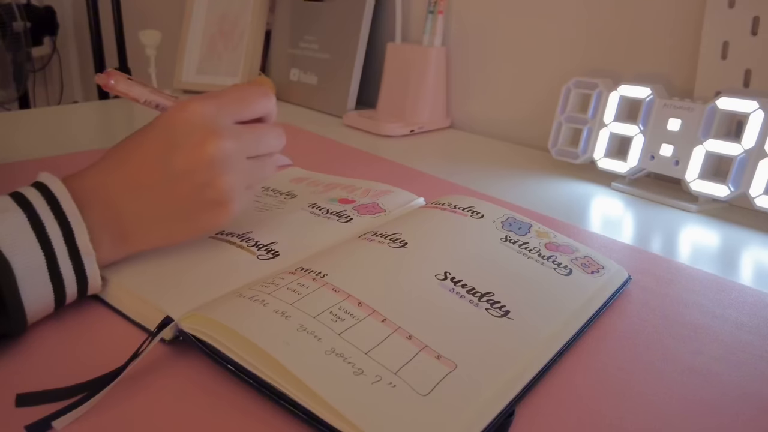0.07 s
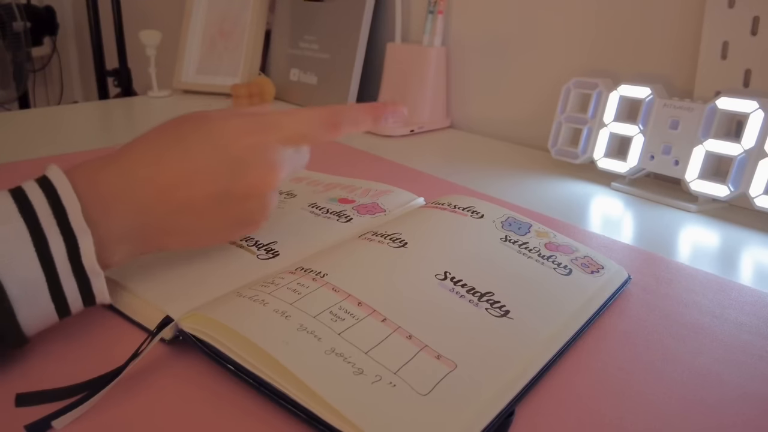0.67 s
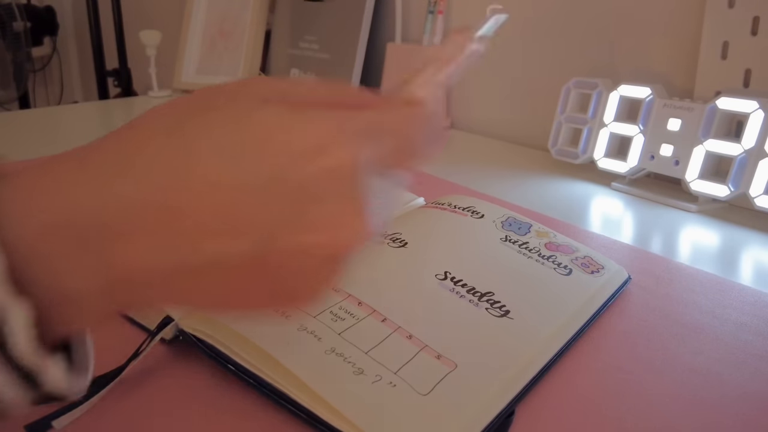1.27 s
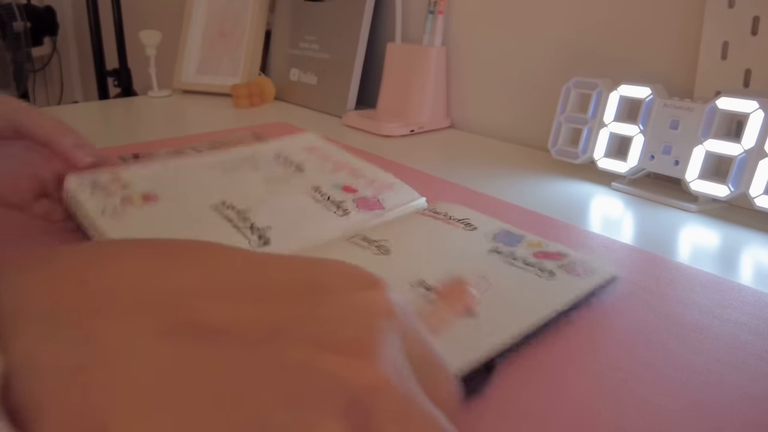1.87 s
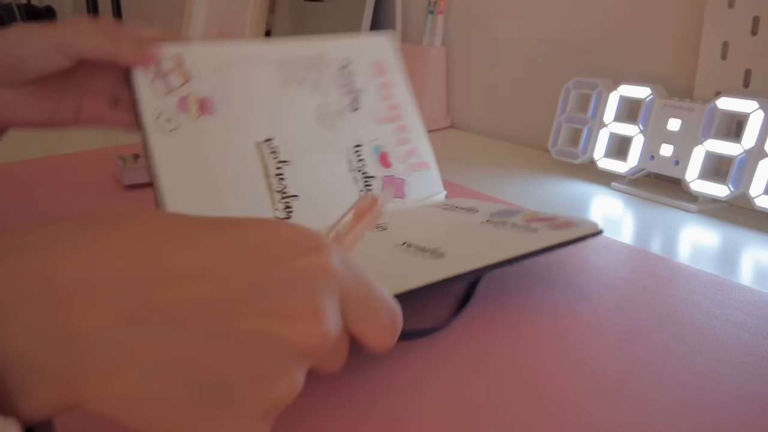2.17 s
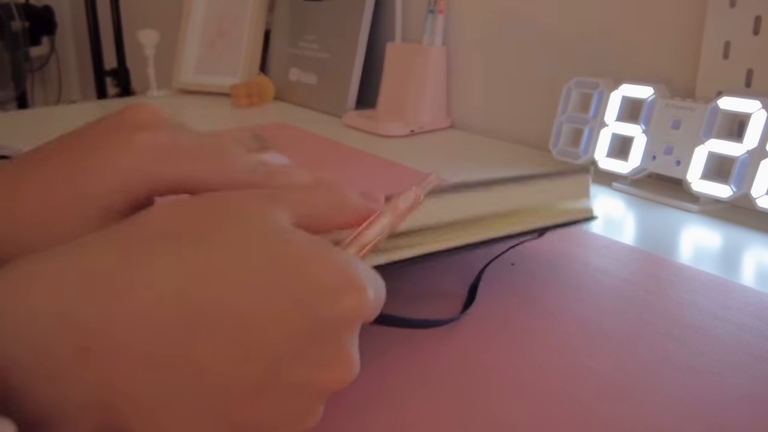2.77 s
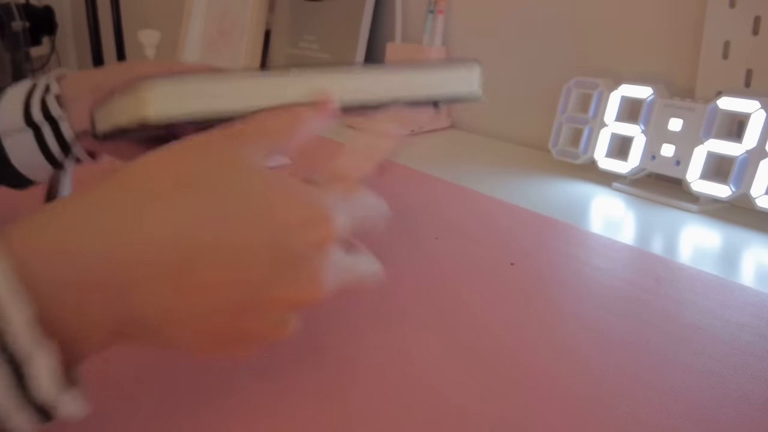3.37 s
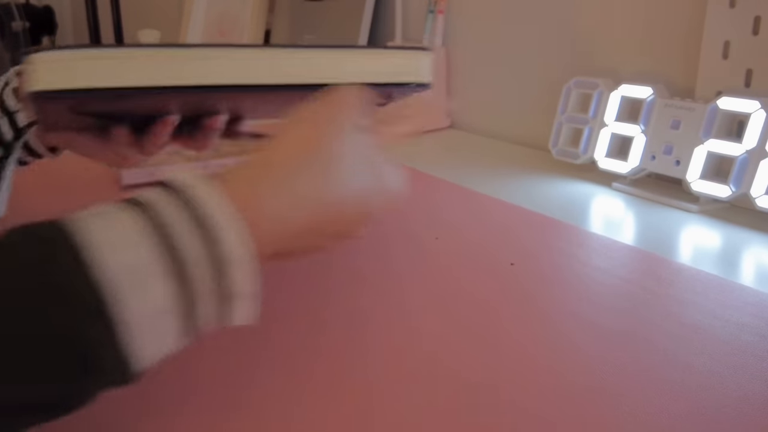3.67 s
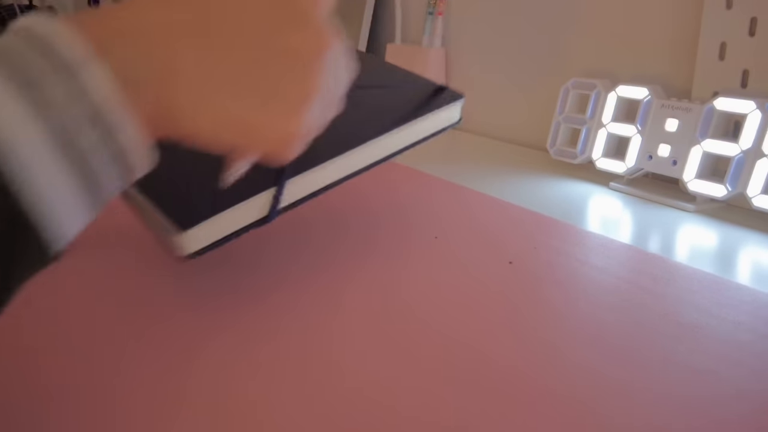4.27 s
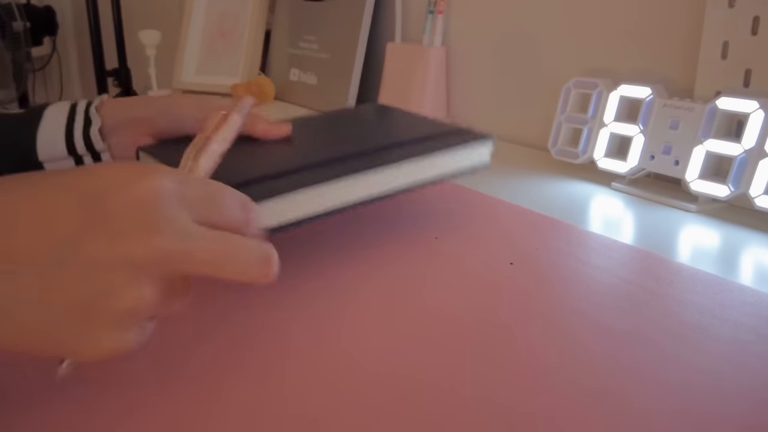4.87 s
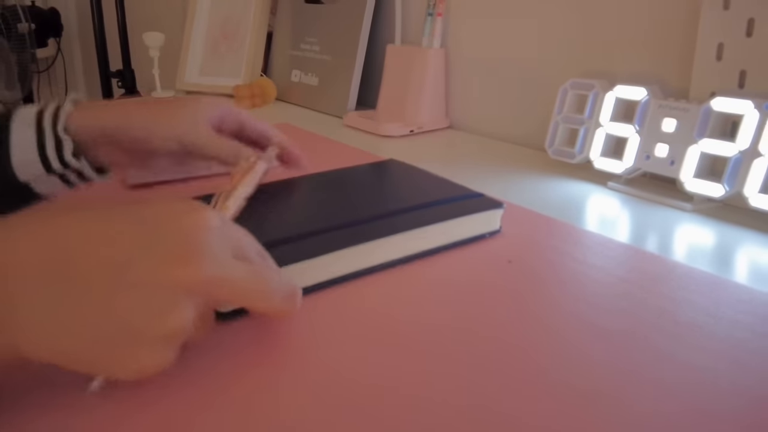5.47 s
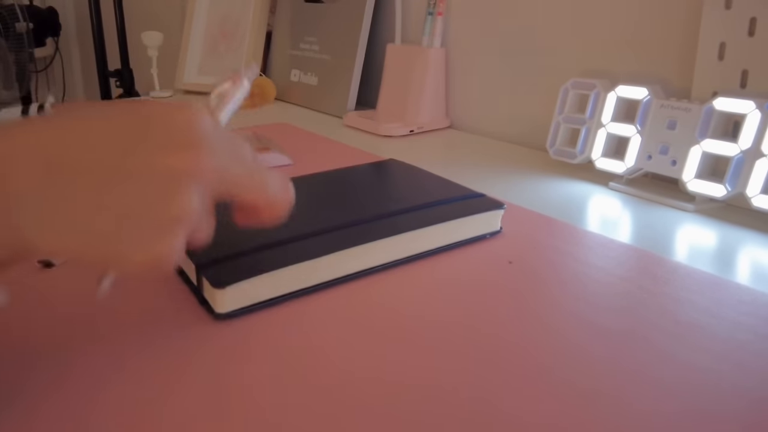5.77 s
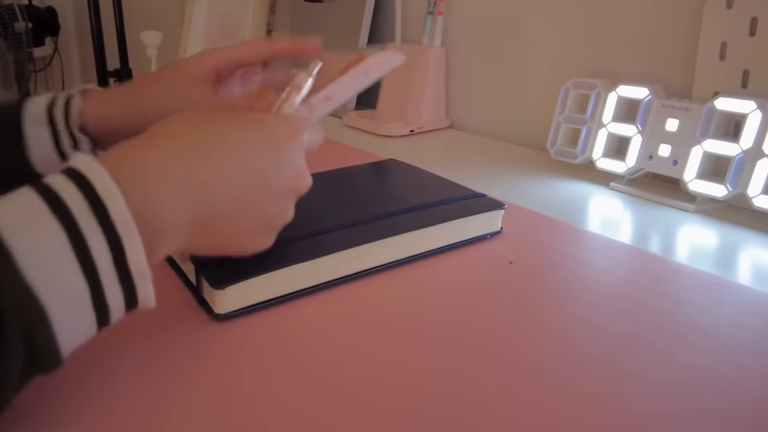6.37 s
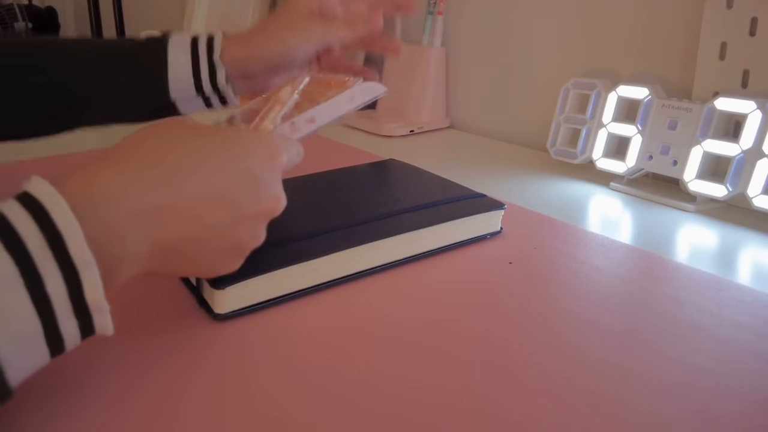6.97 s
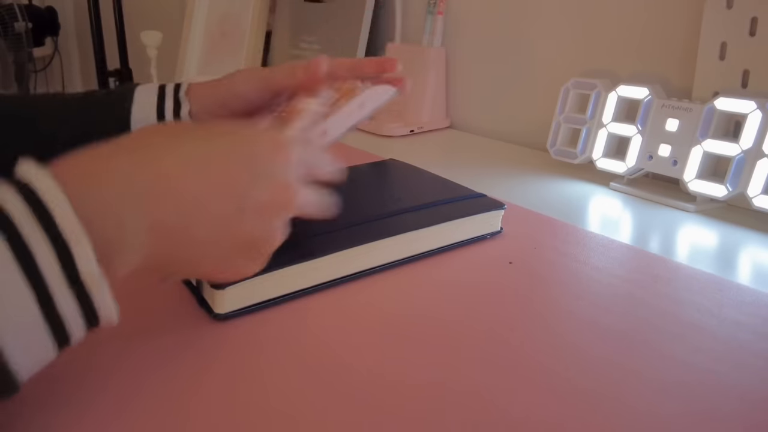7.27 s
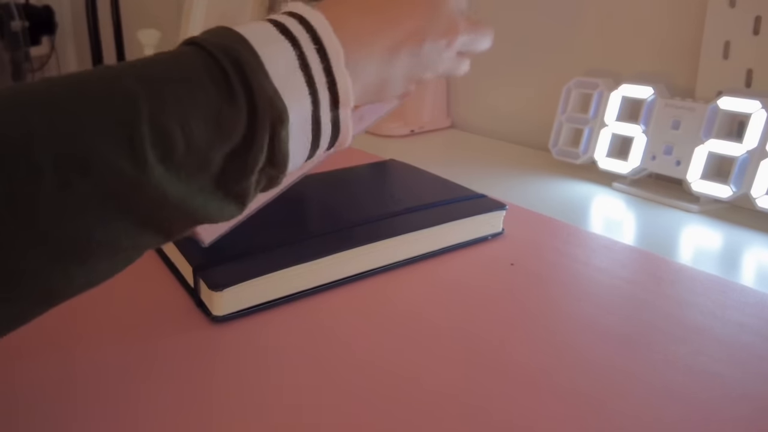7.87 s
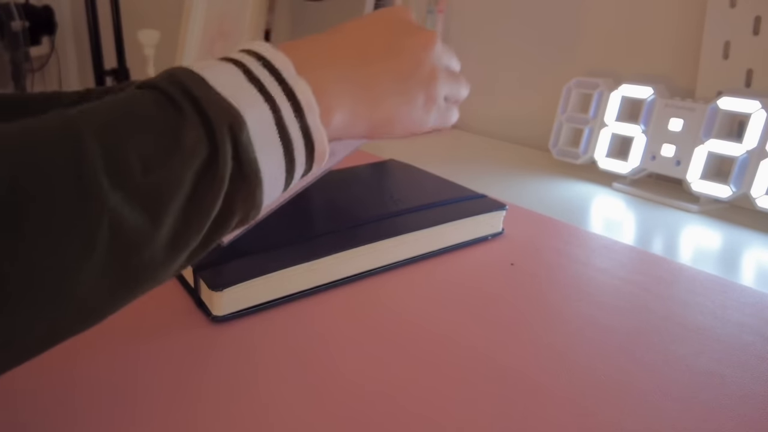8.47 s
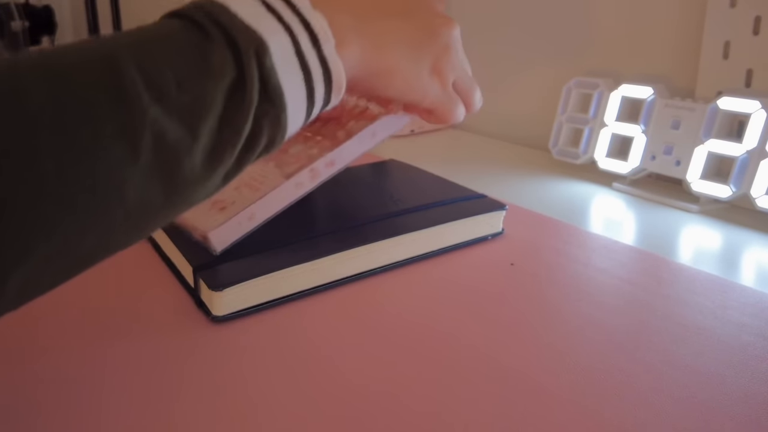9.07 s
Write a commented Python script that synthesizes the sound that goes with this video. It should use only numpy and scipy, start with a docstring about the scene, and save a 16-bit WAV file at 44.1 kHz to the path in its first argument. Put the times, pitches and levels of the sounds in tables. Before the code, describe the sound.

A pen clicks twice, a hardcover notebook is handled, its elastic band snaps, it thumps down, then a plastic case rattles.

```python
"""A hardcover journal is handled on a desk mat in a small quiet room. A pen clicks twice; the book is
closed and lifted, its paper hissing with friction while bumps excite the low modes of the desk.
The elastic band slides and snaps onto the cover, and the book is set down with a thump and a puff of air.
Then a flat plastic case is picked up: it knocks, rattles and rasps by stick-slip under the fingers.
Short reverberation follows the handling, over faint steady air and the rumble of the building."""
import sys
import numpy as np
from scipy import signal
from scipy.fft import rfft, irfft, next_fast_len
from scipy.io import wavfile
from scipy.ndimage import uniform_filter1d

SR = 44100
rng = np.random.default_rng(int(sys.argv[2]) if len(sys.argv) > 2 else 0)


def waveform_to_disk(signal):
    """Save audio, clipped to [-1, 1], as 16-bit WAV at the path in sys.argv[1]."""
    frames = np.transpose(np.atleast_2d(signal))
    scaled = np.clip(frames, -1, 1) * 32767
    samples = np.round(scaled).astype(np.int16)
    wavfile.write(sys.argv[1], SR, samples)


N = 402633
TIME = np.arange(N) / SR
RING_TIME = np.arange(SR // 2) / SR


# Hands bump book and desk; the book lands edge by edge, then flat.
# Each row: start in seconds, then boom, pat and edge tick levels in dB.
BUMPS = [(0.913, -48, -44.5, -75), (1.002, -46, -55, -71), (1.387, -42, -48, -86), (1.547, -52, -46.5, -71),
         (1.602, -52, -50.5, -78), (1.637, -57, -43.5, -78), (1.678, -53, -46, -69),
         (2.949, -52.5, -56.5, -77), (3.152, -49, -49, -70), (3.267, -48.5, -52, -66),
         (3.672, -55, -55.5, -76), (3.871, -52, -54.5, -81), (4.432, -60.5, -55.5, -75),
         (5.757, -43.5, -58, -85), (6.285, -55.5, -53, -85), (7.3065, -47, -44, -59.5)]
BOOK_LANDING = [(5.073, -48, -73, -78), (5.159, -45, -52, -65.5), (5.31, -40.5, -50, -76),
                (5.339, -37.5, -60, -71), (5.43, -26, -38, -67.5)]
# Modes of the desk top. Each row: frequency in Hz, level in dB, time to fall 60 dB in seconds.
DESK_MODES = [(36.3, -3.5, 0.2), (65.2, -12, 0.46), (86, 1, 0.1), (95.4, -8.5, 0.16), (109.8, -6, 0.22),
              (130.9, -10, 0.36), (177, -10, 0.14), (196.3, -16, 0.36), (229.3, -13.5, 0.2),
              (310.6, -30, 0.3)]
# Spectra of a soft and a hard contact. Each row: frequency in Hz, gain in dB.
PAT_SPECTRUM = [(80, -18), (145, -2.5), (210, 2), (300, 5.5), (450, 3), (750, -4.5), (1200, -16.5),
                (2200, -25.5), (5000, -45), (16000, -46)]
CRACK_SPECTRUM = [(200, -10), (900, 3), (2500, -2.5), (5500, -1.5), (8000, -8), (11000, -14), (15000, -15)]

def desk_blows(rows, lowest_hz, pat_decay):
    """Impact excitation: the desk booms in its modes while the mat is patted and an edge ticks."""
    out = np.zeros((2, N))
    highpass = signal.butter(2, lowest_hz, "high", fs=SR)
    boom = crest(signal.lfilter(*highpass, ring(DESK_MODES)))
    for start, boom_db, pat_db, tick_db in rows:
        pat = crest(colour(contact(chatter=2.54, decay=pat_decay), PAT_SPECTRUM))
        tick = crest(colour(contact(chatter=4.1, decay=0.017), CRACK_SPECTRUM))
        add(out, start, amp(boom_db) * boom + amp(pat_db) * pat + amp(tick_db) * tick)
    return out


def air_puff(landing_s, level_db, hz, swell_s):
    """Air displacement: the falling book squeezes out one deep, heavily damped swing of pressure."""
    out = np.zeros((2, N))
    swing = RING_TIME * np.exp(-RING_TIME / swell_s) * np.sin(2 * np.pi * hz * RING_TIME)
    add(out, landing_s - swell_s / 2, amp(level_db) * crest(swing))
    return out


# Stretches of the band hit the cover. Each row: start in seconds, level in dB, left over right in dB.
BAND_SLAPS = [(4.5222, -36, 5.5), (4.5253, -36.5, -3), (4.532, -44, -5), (4.54, -58, 0)]
# Modes of the slapped cover. Each row: frequency in Hz, level in dB, time to fall 60 dB in seconds.
SLAP_MODES = [(336, 7, 0.063), (406, 3, 0.08), (614, 2.5, .05), (810, -23, 0.049), (1220, 7, .02),
              (1660, 8.5, 0.013), (2880, -12, 0.006)]
# Spectrum of a slap. Each row: frequency in Hz, gain in dB.
SLAP_SPECTRUM = [(60, -2), (120, 9.5), (220, -2.5), (350, 5), (600, 9.5), (850, 2.5), (1600, -5),
                 (3000, -0.5), (6000, -2.5), (10000, -4), (16000, -4)]

def elastic_snap():
    """Release of elastic energy: the band whips down in quick slaps and the cover rings under them."""
    out = np.zeros((2, N))
    cover = crest(ring(SLAP_MODES))
    for start, db, pan_db in BAND_SLAPS:
        slap = crest(colour(contact(chatter=2.9, decay=0.0015), SLAP_SPECTRUM))
        add(out, start, amp(db) * (slap + amp(-9.5) * cover), pan_db)
    return out


# Button clicks, and ticks of pen and paper edges.
# Each row: start in seconds, level in dB, left over right in dB.
PEN_CLICKS = [(0.8628, -35.5, 1), (1.021, -32.5, 1)]
EDGE_TICKS = [(0.45, -65, 8), (0.512, -64, 5), (0.5294, -60, 7), (0.6297, -55, 2), (0.645, -56, 0.5),
              (0.6804, -59.5, 0.5), (0.7184, -61, 1.5), (1.548, -64.5, 2), (2.348, -64, 2), (2.594, -62, 0),
              (5.735, -51, 0), (5.815, -52, 2), (8.277, -65, 0), (8.384, -61, 2)]
# Modes of the pen's spring. Each row: frequency in Hz, level in dB, time to fall 60 dB in seconds.
SPRING_MODES = [(14900, -4, 0.083), (15500, -1, .06)]
# Spectra of the click and of fine ticks and hiss. Each row: frequency in Hz, gain in dB.
CLICK_SPECTRUM = [(200, 0), (650, 0), (1700, -5.5), (2150, -13), (2950, 0), (4000, -10.5), (5400, 0),
                  (6600, -3.5), (7600, -4), (9000, -4), (10200, -5), (11800, 2.5), (13500, -2), (15000, 7)]
HISS_SPECTRUM = [(700, -22), (2500, 4.5), (4500, 3.5), (7000, 1.5), (9500, -1.5), (13000, -2), (16000, 2)]

def pen():
    """Brief impacts are broadband: the button latches and releases, its spring rings, and edges tick."""
    out = np.zeros((2, N))
    spring = crest(ring(SPRING_MODES))
    for start, db, pan_db in PEN_CLICKS:
        click = crest(colour(contact(chatter=1.45, decay=0.0014, rise=0.0004), CLICK_SPECTRUM))
        add(out, start, amp(db) * (click + amp(-23.0) * spring), pan_db)
    for start, db, pan_db in EDGE_TICKS:
        tick = crest(colour(contact(chatter=5.5, decay=0.0013), HISS_SPECTRUM))
        add(out, start, amp(db) * tick, pan_db)
    return out


# Fingers grip the stiff cover; the plastic case knocks.
# Each row: start in seconds, ring level in dB, crack level in dB, left over right in dB.
COVER_TAPS = [(3.151, -43.5, -62, 7), (3.155, -49, -73, -12), (3.162, -48, -64, 4), (3.19, -55, -66, 2)]
CASE_KNOCKS = [(5.737, -51, -76, 5), (6.138, -47, -53.5, 3), (6.219, -50, -73, 1), (6.4, -47, -59, 1),
               (6.58, -37.5, -39, 2), (6.622, -47.5, -57, 0), (6.646, -44.5, -56, 0),
               (6.6595, -34, -36, 0.5), (6.916, -58, -63.5, 0.5), (7.313, -53, -47, 3),
               (8.311, -54, -57, 0)]
# Modes of cover and case. Each row: frequency in Hz, level in dB, time to fall 60 dB in seconds.
COVER_MODES = [(459, -4.5, 0.056), (790, -2, 0.016), (1140, -8, 0.029), (1260, 2.5, 0.027),
               (1510, 4.5, 0.0052), (1950, -12, 0.012), (2850, -2.5, 0.0041), (4800, -12, 0.0026)]
CASE_MODES = [(309, -16, 0.062), (570, -14.5, 0.073), (720, -10.5, 0.023), (1050, -7.5, 0.022),
              (1224, 0, 0.032), (1440, -4, 0.026), (1680, 4.5, 0.013), (1726, -8, .04), (2060, -25, 0.011),
              (2570, -7, 0.031), (2870, -4.5, 0.015), (4170, -6, 0.0055), (5400, -6.5, 0.0017)]

def knocks(rows, modes, chatter, decay):
    """Modal superposition: a hard contact cracks and rings a light body; each spot favours other modes."""
    out = np.zeros((2, N))
    mode_rings = np.array([(-1) ** k * ring([mode]) for k, mode in enumerate(modes)])
    for start, ring_db, crack_db, pan_db in rows:
        body = amp(2.5 * rng.standard_normal(len(modes))) @ mode_rings
        tone = crest(signal.fftconvolve(contact(chatter, decay), body)[:len(RING_TIME)])
        crack = crest(colour(contact(chatter=3.7, decay=decay), CRACK_SPECTRUM))
        add(out, start, amp(ring_db) * tone + amp(crack_db) * crack, pan_db)
    return out


# Fingertips catch and let go. Each row: start in seconds, level in dB, pitch in Hz.
FINGER_TICKS = [(1.604, -42.5, 830), (1.639, -47, 835), (2.3479, -62.5, 1250), (2.595, -57.5, 690),
                (2.663, -65, 674), (2.749, -59.5, 860), (2.864, -57, 816), (5.117, -62, 1180),
                (5.158, -52, 725), (5.184, -57, 1340), (5.31, -53.5, 1330), (5.347, -54.5, 1100),
                (5.37, -61.5, 1210), (5.927, -54.5, 960), (5.945, -51.5, 990), (5.978, -56, 1020),
                (6.284, -48, 790), (7.188, -61, 1180), (7.281, -60, 1100), (7.381, -53, 1050),
                (7.605, -66, 1100), (7.894, -56.5, 1380), (7.996, -53, 1030), (8.015, -51.5, 1080),
                (8.12, -55.5, 1020), (8.179, -61.5, 1140), (8.225, -61, 1060), (8.351, -50, 1240),
                (8.426, -58, 1050), (8.749, -54, 1090), (8.955, -59.5, 1060), (8.984, -57, 840)]

def fingertips():
    """Adhesion: skin peels off in milliseconds, exciting a damped hollow resonance and a little grit."""
    out = np.zeros((2, N))
    for start, db, hz in FINGER_TICKS:
        hollow = ring([(hz, 0, .008), (hz * 1.44, -3, .006), (hz * 2.16, -8, .004)])
        force = contact(chatter=2.5, decay=0.0017, rise=0.0018)
        tick = crest(signal.fftconvolve(force, hollow)[:len(force)])
        grit = amp(-14.5) * crest(colour(force, CRACK_SPECTRUM))
        add(out, start, amp(db) * (tick + grit), pan_db=2.0)
    return out


def clatter():
    """Linear superposition: the pressures of all the light, hard contacts add."""
    cover = knocks(COVER_TAPS, COVER_MODES, chatter=1.56, decay=0.0085)
    case = knocks(CASE_KNOCKS, CASE_MODES, chatter=1.6, decay=0.0015)
    return pen() + elastic_snap() + cover + case + fingertips()


# Strokes of paper, cloth and skin. Each row: start, rise and fade in seconds, rub and hiss levels in dB.
SLIDES = [(0.35, 0.087, 0.28, -68.5, -76.5), (0.5, 0.16, 0.44, -71, -81), (1.46, 0.04, 0.15, -57.5, -92),
          (1.589, 0.0095, 0.12, -47, -70), (1.69, 0.026, 0.099, -59, -66.5), (1.7, 0.26, 1, -60, -69.5),
          (2.02, 0.21, 0.042, -80, -70.5), (2.37, 0.015, 0.21, -76, -107), (2.51, 0.087, 0.048, -69, -71),
          (2.76, 0.1, 0.045, -69, -78), (3.15, .025, 0.088, -59, -65.5), (3.22, 0.017, 0.23, -60.5, -69),
          (3.655, 0.041, 0.21, -61, -68), (3.85, 0.022, 0.42, -69, -80), (5.155, 0.067, 0.46, -64, -69.5),
          (5.25, 0.058, 0.33, -62, -81), (5.744, .008, 0.079, -45.5, -64),
          (5.803, 0.0072, 0.21, -53, -69.5)]
# Spectrum of the rub. Each row: frequency in Hz, gain in dB.
RUB_SPECTRUM = [(60, -39), (200, 11.5), (450, 3.5), (800, -1), (1100, -8.5), (1500, -5), (2200, -11),
                (3200, -14), (5000, -42), (16000, -35)]

def sliding():
    """Sliding friction: a dull grainy rub and the fine hiss of fibres follow the speed of each stroke."""
    rub = unit(colour(slips(per_s=700, spread_db=5.0, smooth=0.8), RUB_SPECTRUM))
    hiss = unit(colour(slips(per_s=2100, spread_db=2.5, smooth=1.5), HISS_SPECTRUM))
    return sum(stroke(*move) * (amp(rub_db) * rub + amp(hiss_db) * hiss)
               for *move, rub_db, hiss_db in SLIDES)


# Fingers drag over pen and case. Each row: start, rise and fade in seconds, level in dB.
FINGER_DRAGS = [(0.343, .012, 0.25, -68), (5.915, 0.021, 0.25, -64), (6.111, 0.032, 0.19, -56),
                (6.274, 0.013, 0.14, -61), (6.375, 0.023, 0.44, -67), (6.625, 0.026, .07, -52),
                (6.78, .1, 0.16, -66), (7.08, 0.037, 0.074, -61), (7.88, 0.014, 0.27, -64),
                (8.26, 0.098, 0.17, -59.5), (8.91, 0.035, 0.28, -69)]
# Spectrum of the rasp. Each row: frequency in Hz, gain in dB.
RASP_SPECTRUM = [(100, -7.5), (300, 3.5), (600, 0), (1000, -3), (1500, -0.5), (2100, -6.5), (2800, -7),
                 (4000, -12), (6000, -12), (9000, -20), (16000, -20)]

def rasping():
    """Stick-slip friction: fingertips rasp finely, and sparser catches excite the modes of the plastic."""
    grain = unit(colour(slips(per_s=400, spread_db=3.0, smooth=0.54), RASP_SPECTRUM))
    catches = slips(per_s=130, spread_db=3, smooth=0.11)
    crackle = unit(signal.oaconvolve(catches, ring(CASE_MODES))[:N])
    drag = sum(amp(db) * stroke(*move) for *move, db in FINGER_DRAGS)
    return unit(grain + amp(-4.0) * crackle) * drag


# A sticking surface judders.
# Each row: start and length in seconds, first pitch, last pitch and pole bandwidth in Hz, level in dB.
JUDDERS = [(3.268, 0.0412, 344, 322, 69.5, -55), (4.14, 0.082, 837, 1046, 110, -73.5),
           (5.755, 0.13, 323, 328, 45, -53.5), (5.76, 0.16, 425, 399, 69.6, -63),
           (7.115, 0.08, 355.5, 335, 119, -62)]

def judders():
    """Forced resonance: uneven slips drive one narrow, gliding band into a short groan or squeak."""
    out = np.zeros((2, N))
    for start, length, first_hz, last_hz, width_hz, db in JUDDERS:
        hz = np.linspace(first_hz, last_hz, round(length * SR))
        pole = np.exp(-np.pi * width_hz / SR)
        force = rng.standard_normal(len(RING_TIME)) + 1j * rng.standard_normal(len(RING_TIME))
        waver = signal.lfilter([1], np.poly([pole, pole]), force)[-len(hz):]
        groan = (waver * np.exp(2j * np.pi * np.cumsum(hz) / SR)).real
        add(out, start, amp(db) * unit(groan * signal.windows.tukey(len(hz), .4)))
    return out


# The band is drawn over the cover's edge. Each row: start, rise and fade in seconds, level in dB.
BAND_PULL = [(3.94, .36, 1, -65)]
# Spectrum of the sliding weave. Each row: frequency in Hz, gain in dB.
WEAVE_SPECTRUM = [(200, 0), (700, 6), (1400, 0.5), (2200, -6.5), (4500, -3), (6500, -5), (9500, 0),
                  (11500, -4), (14000, -0.5), (16000, 0)]

def elastic_swish():
    """Roughness noise: the band's fine weave hisses as it slides, until it snaps free."""
    pull = sum(amp(db) * stroke(*move) for *move, db in BAND_PULL)
    weave = unit(colour(slips(per_s=2700, spread_db=5.0, smooth=1.0), WEAVE_SPECTRUM))
    return weave * pull * (TIME < BAND_SLAPS[0][0])


# Spectrum of soft cloth. Each row: frequency in Hz, gain in dB.
SLEEVE_SPECTRUM = [(300, 1.5), (900, -7.5), (1300, 1), (1600, 0), (2100, -9), (2800, -4.5), (4500, -17.5),
                   (10000, -19)]

def sleeve(start_s, level_db):
    """Cloth friction: a faint, hollow rustle continues once the arm starts moving."""
    rustle = unit(colour(slips(per_s=350, spread_db=0, smooth=1.0), SLEEVE_SPECTRUM))
    return amp(level_db) * rustle * (TIME > start_s)


# Reverberation of the room. Each row: frequency in Hz, time to fall 60 dB in seconds.
ROOM_DECAY = [(100, 0.48), (400, 0.22), (1500, 0.27), (5000, 0.25), (15000, 0.16)]

def room(x, wet_db, gap_s, rise_s):
    """Reverberation: dense reflections build up, then absorption drains each band at its own rate."""
    shape = (2, len(RING_TIME))
    reflections = rng.choice([-1., 1.], shape) * (rng.random(shape) < .12)
    hz, t, bands = signal.stft(reflections, SR, nperseg=256)
    absorption = amp(-60 * t / read(ROOM_DECAY, hz)[:, None])
    tail = signal.istft(bands * absorption, SR, nperseg=256)[1][:, :len(RING_TIME)]
    tail = diffuse(tail) * np.clip((RING_TIME - gap_s) / rise_s, 0, 1)
    tail /= np.linalg.norm(tail[0])
    return amp(wet_db) * signal.fftconvolve(x.mean(0)[None], tail, axes=1)[:, :N]


# Spectra of the room's air and the building's rumble. Each row: frequency in Hz, gain in dB.
AIR_SPECTRUM = [(15, -58.5), (25, -14.5), (64, 5.5), (96, -22.5), (129, -4.5), (253, -37), (289, -21.5),
                (349, -36.5), (537, -23.5), (741, -39), (3930, -38.5), (4620, -36), (9810, -46),
                (12200, -40.5), (15500, -64)]
RUMBLE_SPECTRUM = [(20, -5), (45, -12), (62, -2.5), (80, -21), (102, -2), (135, -27), (180, -13),
                   (260, -19.5), (500, -27.5), (1500, -49.5)]

def background():
    """Stationary noise: faint air and the low rumble of the building form a diffuse field."""
    air = np.array([unit(colour(n, AIR_SPECTRUM)) for n in rng.standard_normal((2, N))])
    rumble = np.array([unit(colour(n, RUMBLE_SPECTRUM, size=16384)) for n in rng.standard_normal((2, N))])
    return diffuse(amp(-62.5) * air + amp(-63.0) * rumble)


# Likeness of diffuse sound at left and right. Each row: frequency in Hz, coherence from 0 to 1.
COHERENCE = [(60, 0.98), (150, 0.97), (300, .8), (600, 0.06), (1200, 0.067), (2500, 0.033), (6000, 0.022),
             (15000, 0.055)]

def diffuse(pair):
    """Spatial coherence: long waves are alike at two nearby points, short waves unrelated."""
    size = next_fast_len(pair.shape[1], True)
    a, b = rfft(pair, size)
    coherence = np.clip(read(COHERENCE, np.fft.rfftfreq(size, 1 / SR)), -1, 1)
    mid, side = a * np.sqrt((1 + coherence) / 2), b * np.sqrt((1 - coherence) / 2)
    return irfft(np.array([mid + side, mid - side]), size)[:, :pair.shape[1]]


def from_left(x, lag_us):
    """Path difference: direct sound arrives on the right a moment later."""
    delay = np.sinc(np.arange(-15, 16) - lag_us * SR / 10 ** 6) * np.hanning(31)
    return np.array([x[0], np.convolve(x[1], delay, "same")])


def ring(modes):
    """Damped free vibration: neighbouring modes swing in opposite senses and decay exponentially."""
    return sum((-1) ** k * amp(db - 60 * RING_TIME / t60) * np.sin(2 * np.pi * hz * RING_TIME)
               for k, (hz, db, t60) in enumerate(modes))


def contact(chatter, decay, rise=0.0009):
    """Contact force: one impulse, then tiny impacts that swell and die (time constants in seconds)."""
    envelope = np.exp(-RING_TIME / decay) * (1 - np.exp(-RING_TIME / rise))
    force = rng.standard_normal(len(RING_TIME)) * envelope
    force *= chatter / np.linalg.norm(force)
    force[0] += 1
    return force


def slips(per_s, spread_db, smooth):
    """Friction as shot noise: sparse slips of uneven size over a smooth hiss."""
    sizes = amp(spread_db * np.minimum(rng.exponential(1, N), 4)) * rng.choice([-1, 1], N)
    slipping = rng.random(N) < per_s / SR
    return unit(sizes * slipping) + smooth * rng.standard_normal(N)


def stroke(start, rise, fade):
    """Sliding speed: a smooth push, then exponential slowing by 27.5 dB per fade time."""
    push = np.sin(np.pi / 2 * np.clip((TIME - start) / rise, 0, 1)) ** 2
    return push * amp(-27.5 * np.clip((TIME - start - rise) / fade, 0, 10))


def colour(x, spectrum, size=4096):
    """Minimum-phase filtering: imposes a spectrum causally."""
    log_gain = np.log(amp(read(spectrum, abs(np.fft.fftfreq(size, 1 / SR)))))
    response = np.exp(np.conj(signal.hilbert(log_gain)))
    taps = np.fft.ifft(response).real[:size // 2]
    return signal.oaconvolve(x, taps)[:len(x)]


def add(mix, start, sound, pan_db=0):
    """Level panning: mixes a sound in at its start time, pan_db louder on the left."""
    part = mix[:, round(start * SR):][:, :len(sound)]
    part += amp([[pan_db / 2], [-pan_db / 2]]) * sound[:part.shape[1]]


def read(points, hz):
    """Interpolation on a log-frequency axis."""
    table_hz, values = np.transpose(points)
    return np.interp(np.log(hz + 1), np.log(table_hz + 1), values)


def crest(x):
    """Normalisation of the loudest 4 ms to rms 1."""
    return x / np.sqrt(uniform_filter1d(x ** 2, size=176, mode="constant").max() + 1e-20)


def unit(x):
    """Normalisation to rms 1."""
    return x / np.sqrt(np.mean(x ** 2) + 1e-20)


def amp(db):
    """Amplitude ratio of a level in dB."""
    return 10 ** (np.asarray(db) / 20)


def scene():
    """Superposition of the direct sound, its reflections and the still room."""
    blows = desk_blows(BUMPS, lowest_hz=82, pat_decay=0.011)
    blows += desk_blows(BOOK_LANDING, lowest_hz=20, pat_decay=0.02)  # deeper under more weight
    friction = sliding() + rasping() + judders() + elastic_swish() + sleeve(start_s=0.34, level_db=-79.5)
    handling = clatter() + friction
    puff = air_puff(landing_s=BOOK_LANDING[-1][0], level_db=-19, hz=93.5, swell_s=0.0049)
    echoes = room(handling, wet_db=-3.5, gap_s=0.00036, rise_s=0.00073)
    # contacts radiate a different fine pattern towards the far wall
    echoes += room(clatter(), wet_db=-9.0, gap_s=0.0014, rise_s=0.00088)
    echoes += room(blows, wet_db=-6.5, gap_s=0.0044, rise_s=0.011)
    return from_left(handling + blows + puff, lag_us=14) + echoes + background()


def record(dry):
    """Band limiting: a steep low-pass removes the highest treble."""
    lowpass = signal.firwin(511, cutoff=15950, window=("kaiser", 9), fs=SR)
    return signal.oaconvolve(dry, lowpass[None], "same")


dry = scene()
out = record(dry)
waveform_to_disk(out)
```